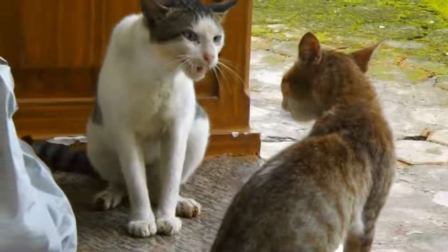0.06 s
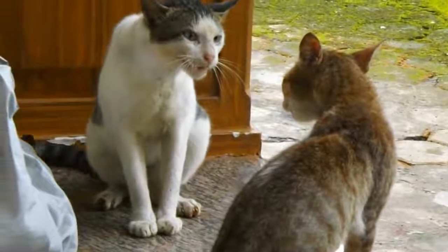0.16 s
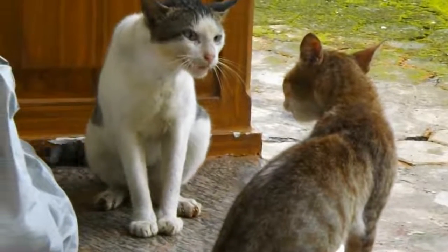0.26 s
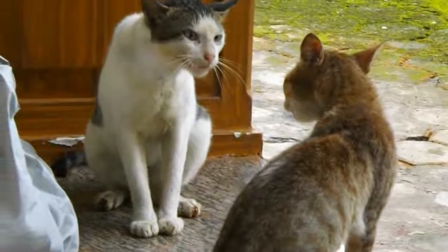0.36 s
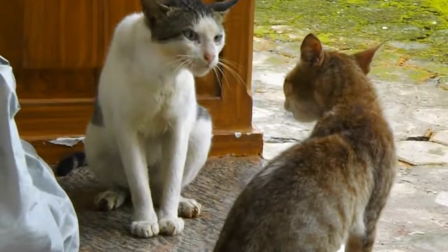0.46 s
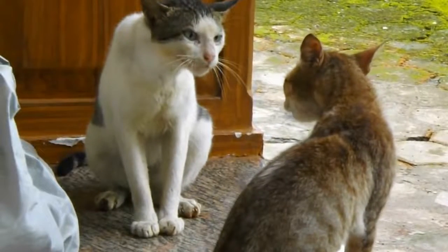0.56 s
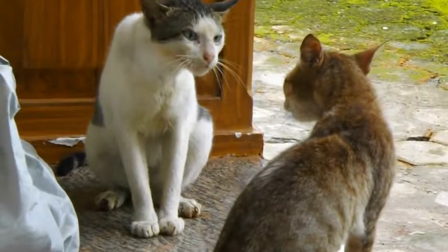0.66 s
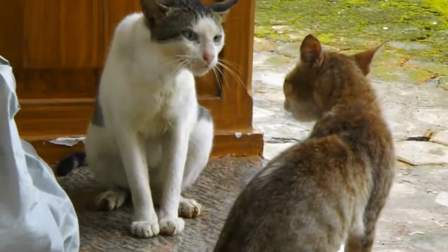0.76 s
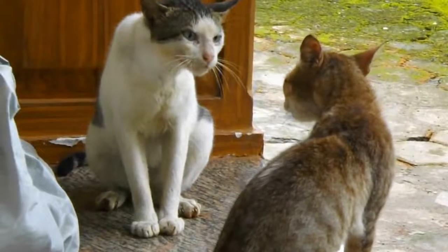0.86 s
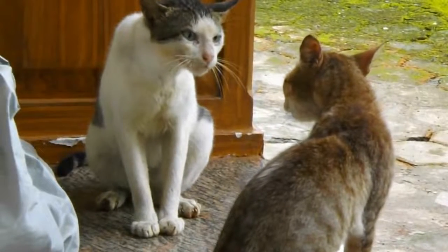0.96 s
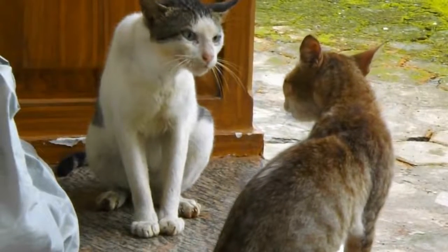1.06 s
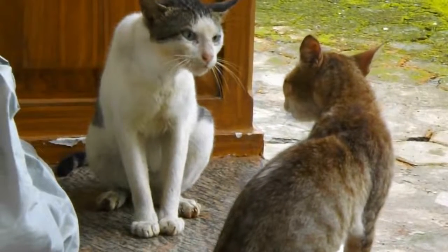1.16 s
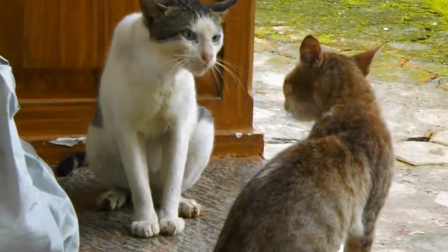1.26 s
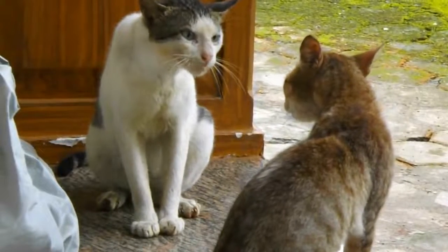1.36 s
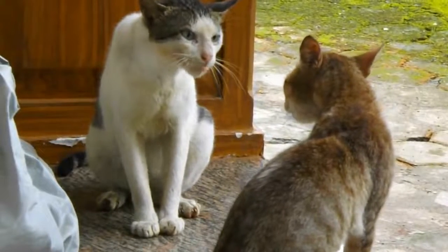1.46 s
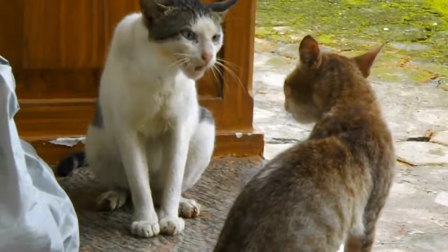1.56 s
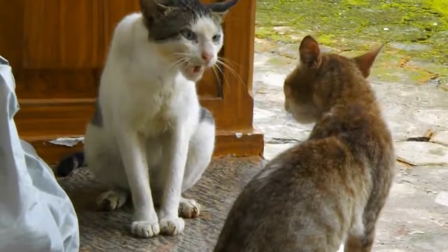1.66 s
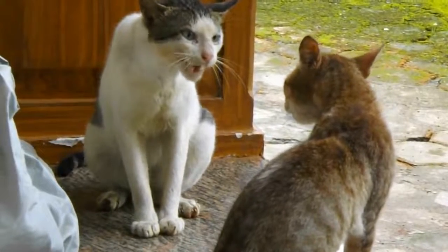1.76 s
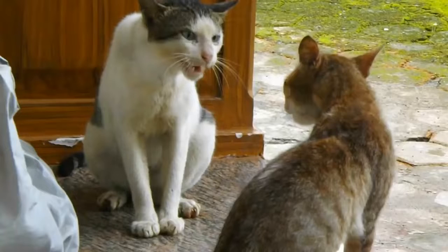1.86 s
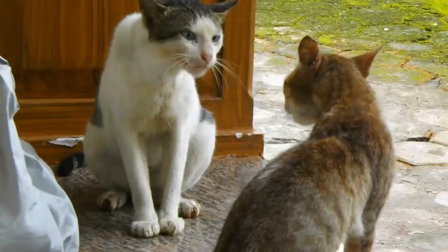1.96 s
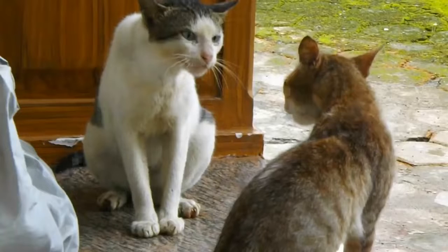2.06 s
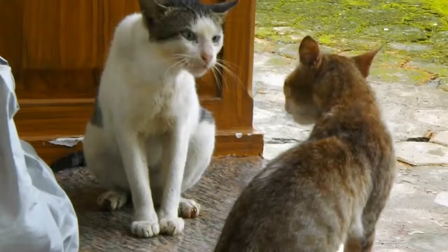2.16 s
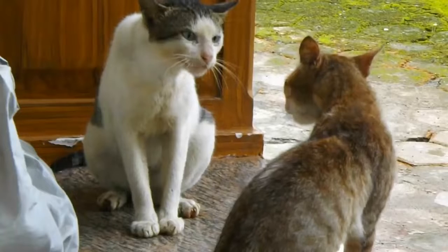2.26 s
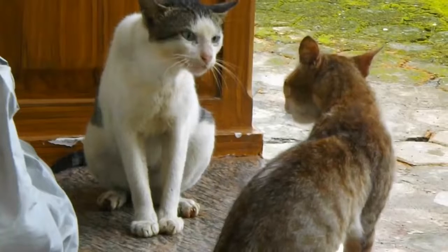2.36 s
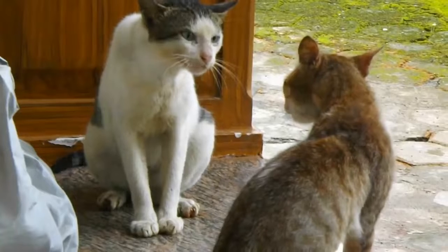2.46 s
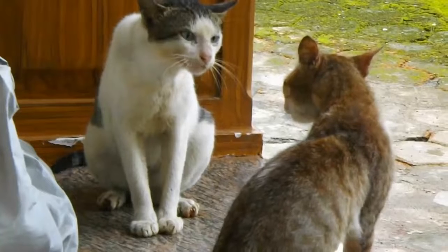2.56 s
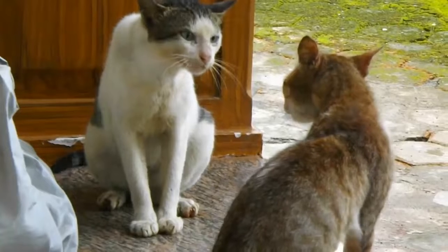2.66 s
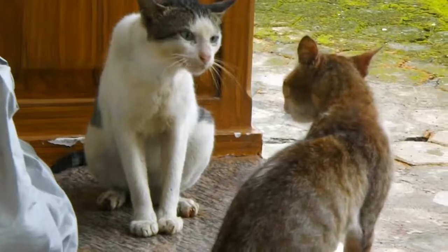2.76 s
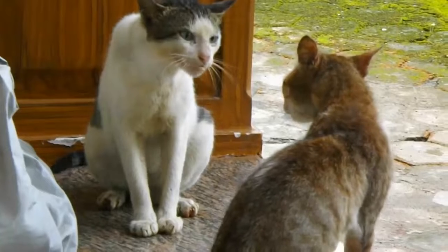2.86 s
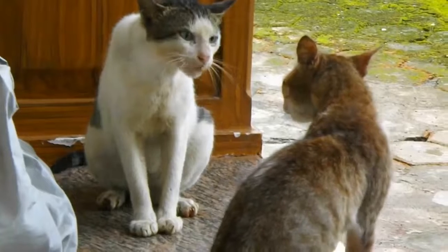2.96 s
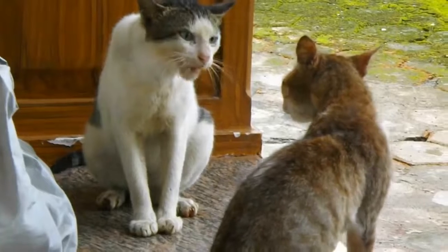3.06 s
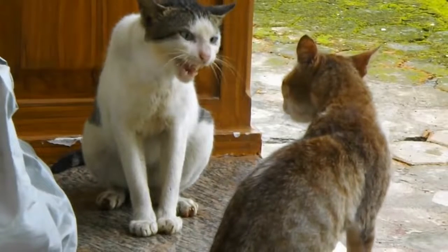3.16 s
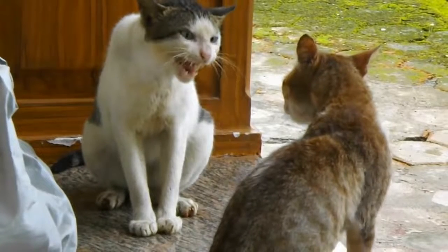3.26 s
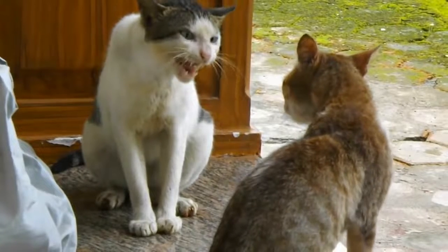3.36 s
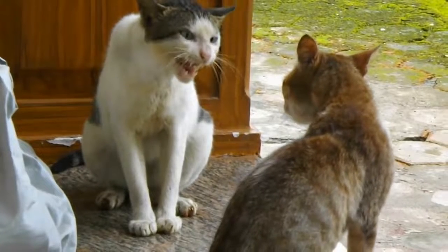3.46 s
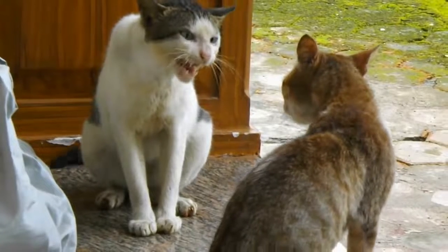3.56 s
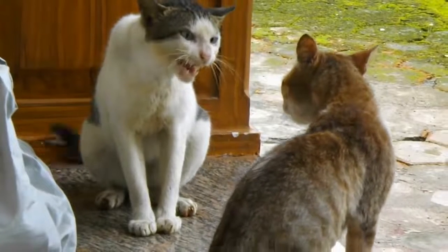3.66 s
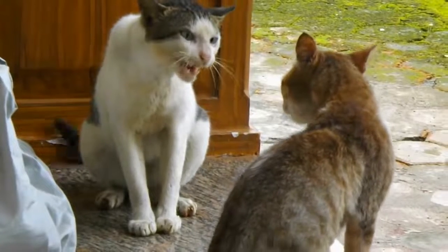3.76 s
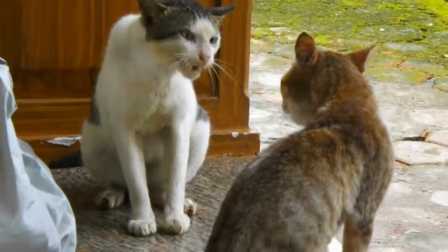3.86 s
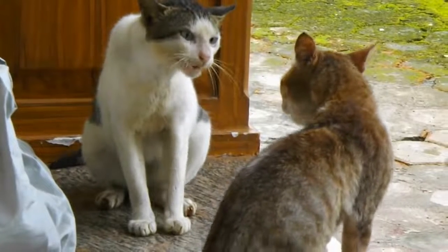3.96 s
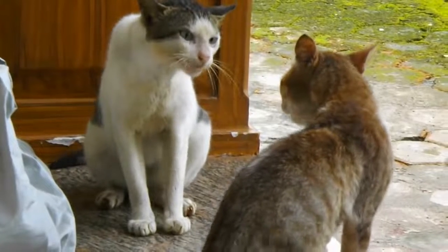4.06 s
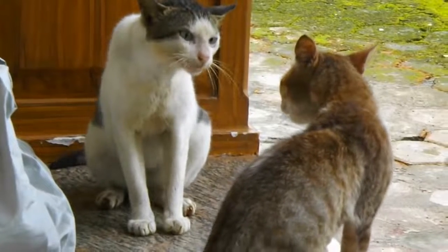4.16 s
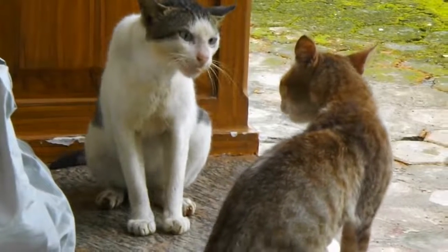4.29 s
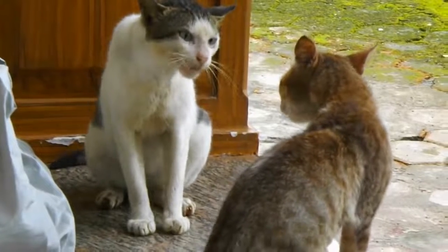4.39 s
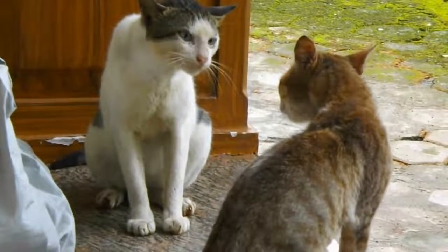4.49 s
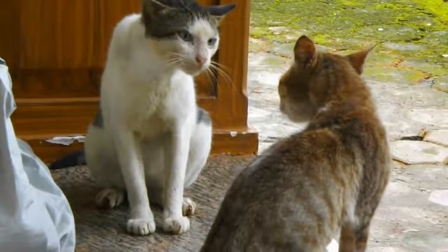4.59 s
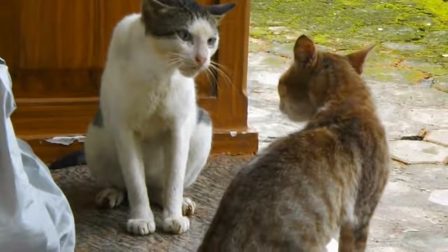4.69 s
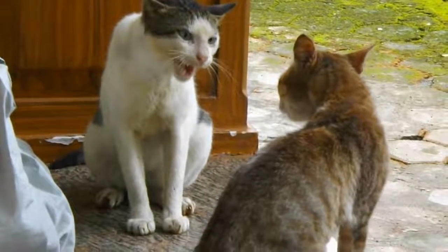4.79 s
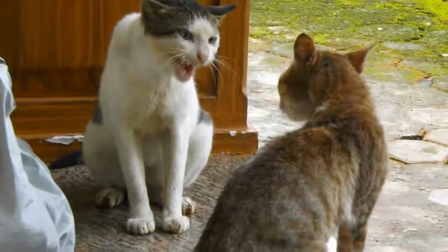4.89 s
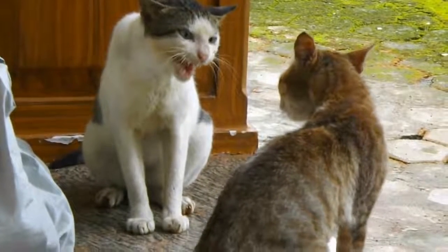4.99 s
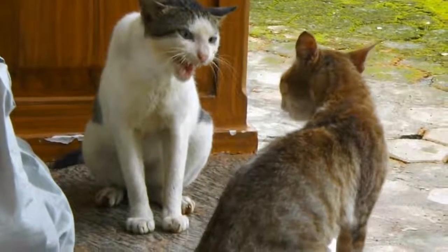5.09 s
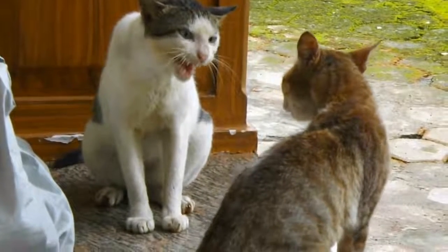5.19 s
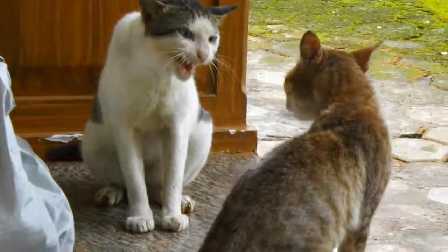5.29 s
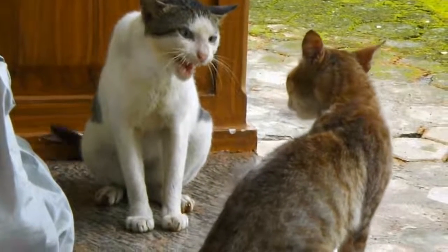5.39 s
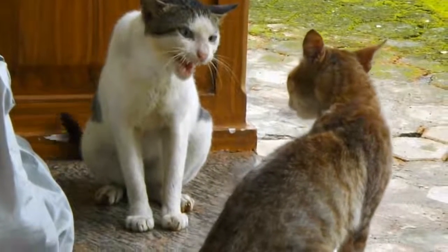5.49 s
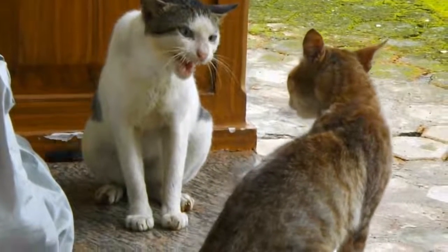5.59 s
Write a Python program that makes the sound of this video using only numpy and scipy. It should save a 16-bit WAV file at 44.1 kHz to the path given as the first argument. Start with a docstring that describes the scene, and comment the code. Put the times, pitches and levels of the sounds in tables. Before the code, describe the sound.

Tense cat threat calls outdoors: short whining moans, then two long piercing yowls, over faint airy hiss and a far motorbike.

```python
"""You hear a cat on a doorstep yowl four times at a rival, each call gliding as the jaw opens and closes.
Three soft closed-mouth moans follow or overlap calls. Every voice is a stack of partials shaped by resonances.
Door and porch throw the voices back, so the partials swell and dip as they glide.
Behind them are outdoor air (coloured noise), a far motorbike (a low note under a roar),
a faint insect (narrow high noise) and one soft bump (a short swell of low noise)."""
import sys
import numpy as np
from scipy import signal
from scipy.fft import rfft, irfft
from scipy.io import wavfile

SR = 44100
rng = np.random.default_rng(int(sys.argv[2]) if len(sys.argv) > 2 else 0)


def materialize(psi):
    """Save the field psi as 16-bit PCM at rate SR to the path in sys.argv[1].

    A 1-D psi becomes a single channel; in a 2-D psi each row is a channel.
    """
    bounded = np.clip(np.atleast_2d(psi).T, -1, 1)
    quanta = np.round(bounded * 32767).astype(np.int16)
    wavfile.write(sys.argv[1], SR, quanta)


N = 248298
TIME = np.arange(N) / SR

# The outdoor air's colour. Each row: frequency in Hz, relative level in dB per Hz.
AIR_COLOUR = [(25, -33), (55, -12.5), (95, -19.5), (140, -11.5), (280, -21.5), (400, -15.5), (560, -4),
              (950, -3.5), (1500, -2), (2300, -4.5), (4000, -6.5), (5200, -2.5), (5900, -10), (10500, -10),
              (15800, -10)]
AIR_DB = -50.5

# The distant motorbike. Each row: time in seconds, firings per second, roar level in dB.
BIKE_PASS = [(0, 55, -60.5), (1.1, 49, -56.5), (1.6, 82, -56), (2.0, 69, -51), (2.3, 73, -47.5),
             (3.1, 72, -50.5), (3.7, 100, -51), (4.5, 103, -61), (5.63, 52, -59.5)]
# The colour of its roar. Each row: frequency in Hz, relative level in dB per Hz.
ROAR_COLOUR = [(71, -61), (120, -31), (139, -12.5), (263, -8), (523, 1), (744, -4.5), (1060, -5.5),
               (1940, -9.5), (2390, -11.5), (5000, -14.5), (5500, -24), (7150, -57), (12100, -120)]
# Its exhaust note. Each row: multiple of the firing rate, relative level in dB.
EXHAUST_PARTIALS = [(1, 0), (2, -5.5), (3, -2), (4, -8.5), (5, -1)]

# Early reflections from ground, door and wall. Each row: delay in seconds, pressure ratio (minus flips it).
REFLECTIONS = [(.0042, 0.027), (.00469, -0.14), (.00669, 0.23), (.01275, 0.16), (0.0224, 0.19),
               (0.0285, 0.3), (0.049, -0.029)]
# The diffuse tail: time to fall 60 dB, where its treble starts to go, and its level.
PORCH_T60_S, PORCH_DULL_HZ, PORCH_DB = 0.33, 6660, -6

# Closed-mouth moans. Each row: start in seconds, length in seconds, first pitch in Hz, pitch it sinks
# towards in Hz, fall time in seconds, starting level in dB before voice_db, muffled above in Hz.
MOAN_CALLS = [(0.169, 0.46, 669, 530, .28, -41.5, 3800), (2.053, 0.32, 765, 654.3, .09, -39.5, 2150),
              (5.024, .16, 771, 520, .08, -42.5, 1200)]
# Resonances with the mouth shut. Each row: frequency in Hz, relative gain in dB.
MUZZLE_RESONANCES = [(550, 1.5), (750, 1), (1150, 4.5), (1350, -0.5), (1650, -20.5), (1980, -17), (2300, 0),
                     (2620, -2.5), (3200, -30), (4500, -12), (5250, 2), (6000, -48), (8000, -56)]
MOAN_ATTACK_S, MOAN_FADE_DB = 0.023, 20.5  # the fade is spread evenly over the moan's length

# One curve for each yowl. Each row: time in seconds, pitch in Hz, mouth level in dB before voice_db,
# jaw opening from 0 to 1.
YOWL_CURVES = [
    [(0, 623, -39.5, 0.4), (.05, 627.7, -39, 0.42), (.15, 582.7, -33.5, 0.38), (.18, 565.6, -35.5, 0)],
    [(1.667, 573, -39.5, 0.07), (1.685, 615, -44.5, 0.07), (1.71, 683, -33.5, 0), (1.745, 750, -46, .42),
     (1.78, 717.6, -36, 0.55), (1.81, 744, -43, .62), (1.96, 728, -39, 0.55), (2.01, 698.4, -28.5, 0.01),
     (2.06, 638.4, -36, 0.06)],
    [(3.165, 777, -44.5, 0.4), (3.195, 762, -30.5, 0.19), (3.225, 794, -26.5, 0.75),
     (3.29, 900.3, -26, 0.84), (3.37, 892, -23, .83), (3.53, 817, -19.5, 1), (3.63, 786.5, -22, 0.75),
     (3.78, 803.5, -27, .85), (3.9, 754.5, -31, .48), (4.0, 740, -43.5, 0.41), (4.09, 668.5, -47.5, 0.08)],
    [(4.83, 400, -57, 0.44), (4.86, 441, -42, 0.24), (4.9, 570, -39.5, 0.68), (4.96, 766.3, -30.5, 0.75),
     (5.02, 768.3, -22, 0.83), (5.07, 808, -18, 1), (5.13, 814.7, -17.5, 0.99), (5.28, 776.1, -19.5, 0.82),
     (5.45, 774, -20.5, .82), (5.63, 781.8, -19, 0.82)],
]
# The colour of each yowl. Each row: fundamental level in dB at middling strength (before voice_db),
# shrill edge adjustment in dB, sharpness of the mouth as Q before harshness damps it.
YOWL_COLOURS = [(-46.5, 4.5, 1.9), (-41, 1, 2.34), (-37, -0.5, 2.36), (-48, -2.5, 2.3)]
# Upper throat resonances. Each row: frequency in Hz, relative gain in dB.
THROAT_RESONANCES = [(2000, 35), (3100, 8.5), (3700, 1), (4100, 10.5), (4650, -4), (5000, 9.5), (5400, 3),
                     (5800, -0.5), (6300, -6.5), (7000, -15), (7700, -33.5), (9400, -34), (11500, -42.5)]
# The voice turns harsh for a moment. Each row: time in seconds, half length in seconds, added roughness.
HARSH_MOMENTS = [(1.75, 0.052, 0.2), (2.04, .04, .25), (3.19, .06, 0.43), (3.54, 0.18, 0.24),
                 (3.89, 0.14, 0.33), (4.91, 0.057, .9)]
CALM_ROUGHNESS = 0.02
# The fundamental thins out briefly. Each row: time in seconds, half length in seconds, loss in dB.
THIN_MOMENTS = [(.1, .03, 18), (3.32, 0.12, 7), (3.515, 0.038, 22)]
# Around this call level the fundamental swells less than the rest of the voice.
MIDDLING_DB = -30
# The shrill edge relative to the call, before each yowl's own adjustment.
EDGE_SHUT_DB, EDGE_OPEN_DB = -28, -3.5
# The mouth resonance climbs as the jaw drops.
JAW_SHUT_HZ, JAW_OPEN_HZ = 834, 3104


def from_db(db):
    """Turn decibels into gain."""
    return 10 ** (np.asarray(db) / 20)


def rms_one(x):
    """Scale a sound to an rms of 1."""
    return x / np.sqrt(np.mean(x ** 2) + 1e-20)


def in_time(rows, t=TIME):
    """Read each column of a curve at the times t."""
    seconds, *columns = np.transpose(rows)
    return [np.interp(t, seconds, column) for column in columns]


def at_hz(points, hz):
    """Read the gain of a spectrum at the given frequencies."""
    point_hz, db = np.transpose(points)
    return from_db(np.interp(np.log(np.maximum(hz, 1)), np.log(point_hz), db))


def noise(colour):
    """Make noise of a given colour, rms 1."""
    spectrum = rfft(rng.standard_normal(N))
    gains = at_hz(colour, np.fft.rfftfreq(N, 1 / SR))
    return rms_one(irfft(spectrum * gains, N))


def band_noise(low_hz, high_hz):
    """Make noise between two frequencies, rms 1."""
    sos = signal.butter(2, [low_hz, high_hz], "band", fs=SR, output="sos")
    return rms_one(signal.sosfilt(sos, rng.standard_normal(N)))


def drift(rate_hz, size):
    """Wander smoothly by chance, up to a given rate, rms 1."""
    sos = signal.butter(2, rate_hz, fs=SR, output="sos")
    # the extra half second lets the filter settle
    wander = signal.sosfilt(sos, rng.standard_normal(size + SR // 2))
    return rms_one(wander[-size:])


def swells(rows, t):
    """Add up smooth humps, each given by its time, half length and height."""
    return sum(height * np.exp(-((t - at_s) / half_s) ** 2) for at_s, half_s, height in rows)


def span(start, stop, fade_s=0.003):
    """Find the samples that a call covers, and its soft start and stop."""
    at = np.flatnonzero((TIME > start - fade_s) & (TIME < stop + fade_s))
    inside_s = np.minimum(TIME[at] - start, stop - TIME[at])
    return at, np.clip(inside_s / fade_s + 1, 0, 1)


def outdoor_air():
    """Steady outdoor noise with its own colour."""
    return from_db(AIR_DB) * noise(AIR_COLOUR)


def insect(level_db=-73, flicker_db=3):
    """A thin, far shrill: a narrow band of high noise with a flickering level."""
    return from_db(level_db + flicker_db * drift(12, N)) * band_noise(10050, 10450)


def bump(at_s=4.29, width_s=0.06, level_db=-53):
    """A soft, dull knock: low noise that swells and dies away smoothly."""
    return from_db(level_db) * np.exp(-((TIME - at_s) / width_s) ** 2) * band_noise(174, 610)


def motorbike(exhaust_db=-78, exhaust_follows=0.57, flutter_db=0.5, throb_db=3.0,
              drone_db=-62, drone_at_s=2.14, drone_s=0.29):
    """A low exhaust note under a roar blurred by distance, with one brief swell of a drone."""
    firing, roar_db = in_time(BIKE_PASS)
    note_db = exhaust_db + exhaust_follows * (roar_db - roar_db.mean())
    uneven = 1 + 0.0129 * drift(27.7, N)
    phase = 2 * np.pi * np.cumsum(firing * uneven) / SR
    note = np.zeros(N)
    for multiple, db in EXHAUST_PARTIALS:
        throb = from_db(db + throb_db * drift(9.7, N))
        note += throb * np.sin(round(multiple) * phase)
    drone_swell = np.exp(-((TIME - drone_at_s) / drone_s) ** 2)
    drone = from_db(drone_db) * drone_swell * band_noise(239.5, 240.8)
    roar = from_db(roar_db + flutter_db * drift(28, N)) * noise(ROAR_COLOUR)
    return from_db(note_db) * note + drone + roar


def porch(x, build_s=0.0027):
    """A few distinct reflections join the direct sound, then a short diffuse tail with softened treble."""
    early = sum(ratio * np.interp(TIME - delay, TIME, x, left=0) for delay, ratio in REFLECTIONS)
    t = TIME[:SR // 2]
    tail = rng.standard_normal(len(t)) * from_db(-60 * t / PORCH_T60_S) * np.clip(t / build_s, 0, 1)
    tail /= np.linalg.norm(tail)
    tail = signal.sosfilt(signal.butter(1, PORCH_DULL_HZ, fs=SR, output="sos"), tail)
    return x + early + from_db(PORCH_DB) * signal.fftconvolve(x, tail)[:N]


def folds(pitch, rough, jitter=0.015, jitter_hz=150, waver=0.0023, shimmer=0.06, flutter=0.29,
          flutter_hz=125, sway_db=2.94, sway_hz=16, count=14):
    """Partials of the vocal folds: roughness makes cycles uneven and fluttery, and each partial sways."""
    size = len(pitch)
    uneven = 1 + jitter * rough * drift(jitter_hz, size) + waver * drift(25, size)
    phase = 2 * np.pi * np.cumsum(pitch * uneven) / SR
    # a harsh voice flutters far below its pitch, which splits the partials
    flap_hz = flutter_hz * (1 + 0.155 * drift(14, size))
    flap = np.sin(2 * np.pi * np.cumsum(flap_hz) / SR)
    strength = 1 + rough * (flutter * flap + shimmer * drift(jitter_hz, size))
    multiple = np.arange(1, count + 1)[:, None]
    sway = from_db(sway_db * np.array([drift(sway_hz, size) for _ in multiple]))
    partials = np.sqrt(2) * np.sin(multiple * phase) * sway * strength
    return multiple * pitch, partials


def blend(partials, gains):
    """Sum weighted partials, dividing out the overall size of the weights."""
    return (partials * gains).sum(0) / np.sqrt((gains ** 2).sum(0))


def moans(rough=0.56, flutter_db=3.0):
    """Soft, fluttering calls through a shut mouth; each holds its pitch briefly, then sinks and fades."""
    out = np.zeros(N)
    for start, length, top_hz, end_hz, fall_s, peak_db, muffle_hz in MOAN_CALLS:
        at, gate = span(start, start + length)
        age = TIME[at] - start
        pitch = end_hz + (top_hz - end_hz) * np.exp(-(age / fall_s) ** 2)
        level_db = peak_db - MOAN_FADE_DB * age / length + flutter_db * drift(30, len(at))
        attack = np.clip(age / MOAN_ATTACK_S, 0, 1)
        hz, partials = folds(pitch, rough)
        muffling = np.hypot(1, (hz / muffle_hz) ** 3)
        colour = at_hz(MUZZLE_RESONANCES, hz) / muffling
        out[at] += gate * attack * from_db(level_db) * blend(partials, colour)
    return out


def yowls(hiss_db=-13, scrape_db=-7, fundamental_follows=0.69, damping=2.65):
    """Open-mouthed calls: a fundamental, three partials in the mouth resonance and a jaw-led shrill edge."""
    out = np.zeros(N)
    hiss, scrape = band_noise(1100, 3300), band_noise(3500, 4900)
    for rows, (fundamental_db, shrill_db, sharpness) in zip(YOWL_CURVES, YOWL_COLOURS):
        at, gate = span(rows[0][0], rows[-1][0])
        pitch, mouth_db, jaw = in_time(rows, TIME[at])
        base_db = fundamental_db + fundamental_follows * (mouth_db - MIDDLING_DB)
        base_db -= swells(THIN_MOMENTS, TIME[at])
        edge_db = mouth_db + shrill_db + EDGE_SHUT_DB + (EDGE_OPEN_DB - EDGE_SHUT_DB) * jaw
        rough = CALM_ROUGHNESS + swells(HARSH_MOMENTS, TIME[at])
        hz, partials = folds(pitch, rough)
        # a harsh voice leaks air, which damps the mouth resonance
        q = sharpness / (1 + damping * rough)
        centre = JAW_SHUT_HZ * (JAW_OPEN_HZ / JAW_SHUT_HZ) ** jaw
        mouth = 1 / (1 + (q * (hz / centre - centre / hz)) ** 2)
        voice = from_db(base_db) * partials[0]
        voice += from_db(mouth_db) * blend(partials[1:4], mouth[1:4])
        voice += from_db(edge_db) * blend(partials[4:], at_hz(THROAT_RESONANCES, hz[4:]))
        # turbulence at the folds puffs once a cycle and is strong only when the voice is harsh
        turbulence = from_db(mouth_db + hiss_db) * hiss[at] + from_db(mouth_db + scrape_db) * scrape[at]
        voice += rough ** 2 * turbulence * (1 + partials[0] / 2)
        out[at] += gate * voice
    return out


def scene(voice_db=-0.9, own_hiss_db=-63):
    """Everything reaches the left port one sample later; each port adds its own hiss."""
    cat = porch(from_db(voice_db) * (yowls() + moans()))
    right = cat + motorbike() + insect() + bump() + outdoor_air()
    left = np.concatenate([right[:1], right[:-1]])
    return np.array([side + from_db(own_hiss_db) * band_noise(5200, 16000) for side in (left, right)])


def record(dry, cutoff_hz=15800):
    """Cut the top steeply with a low-pass filter."""
    return signal.sosfilt(signal.ellip(12, 0.1, 80, cutoff_hz, fs=SR, output="sos"), dry)


dry = scene()
out = record(dry)
materialize(out)
```